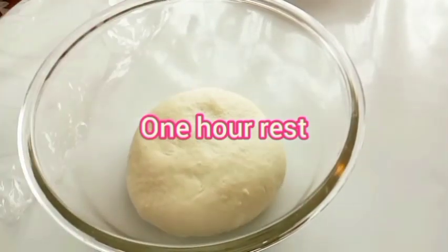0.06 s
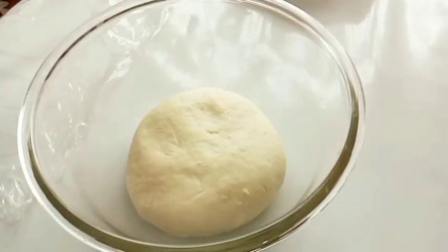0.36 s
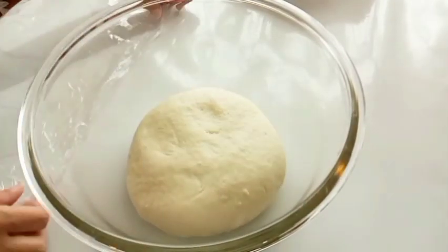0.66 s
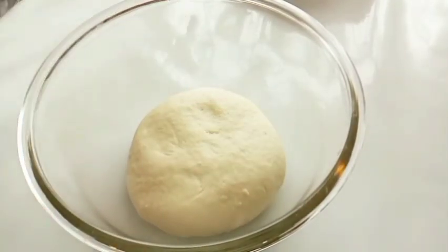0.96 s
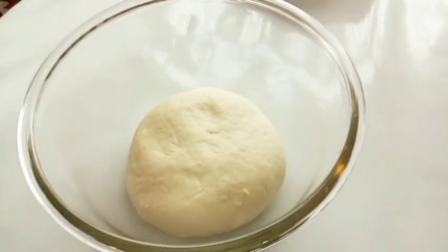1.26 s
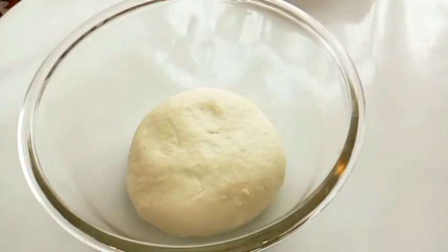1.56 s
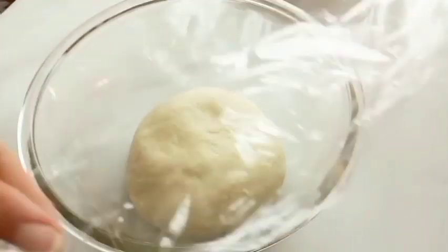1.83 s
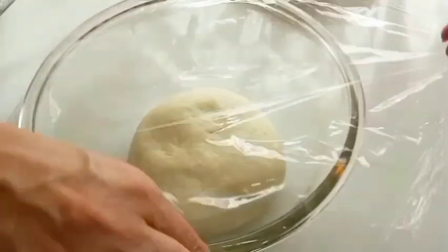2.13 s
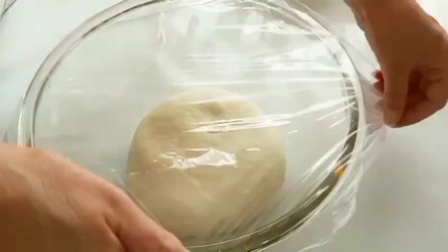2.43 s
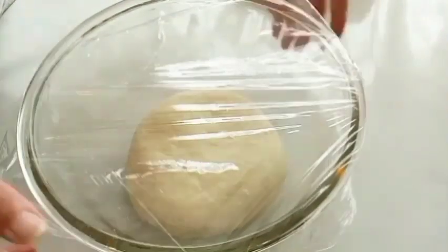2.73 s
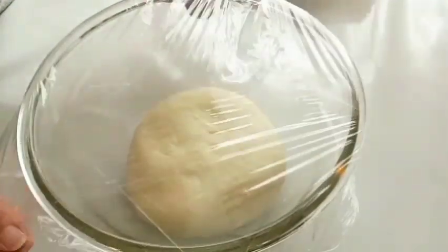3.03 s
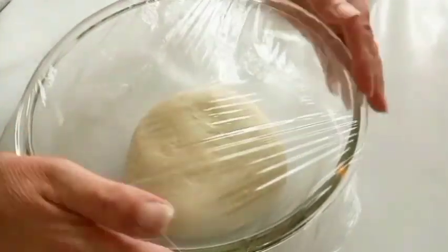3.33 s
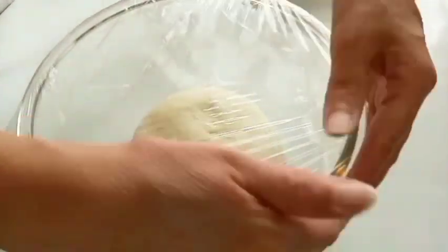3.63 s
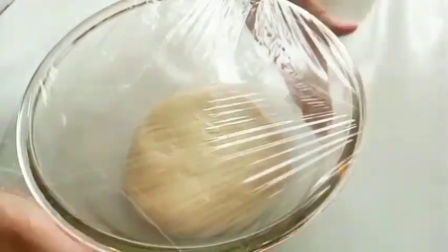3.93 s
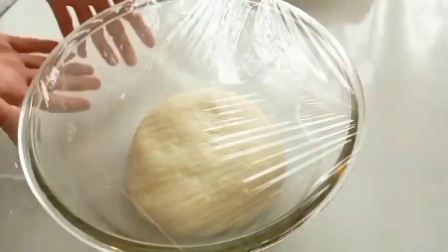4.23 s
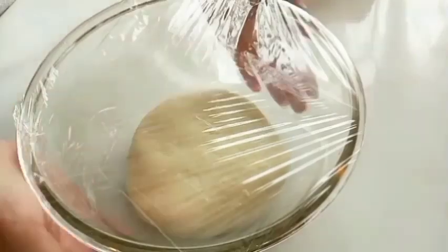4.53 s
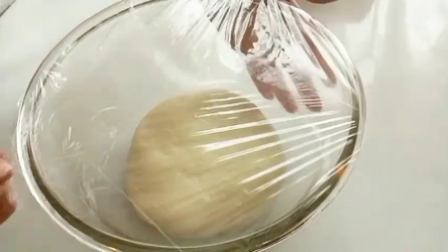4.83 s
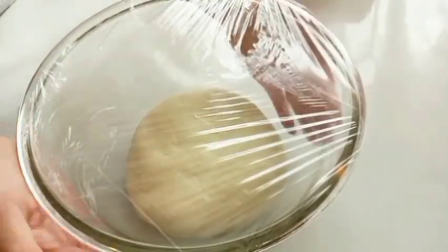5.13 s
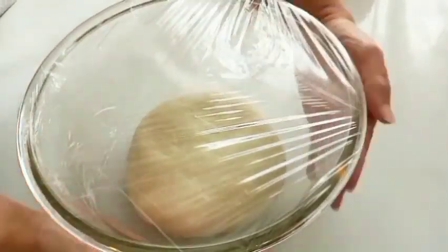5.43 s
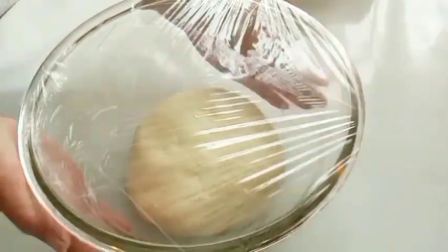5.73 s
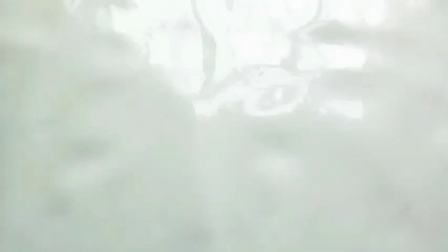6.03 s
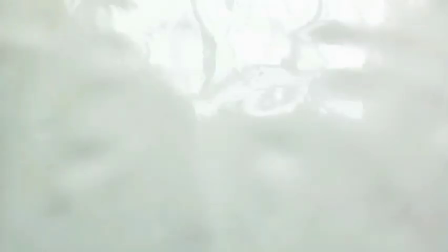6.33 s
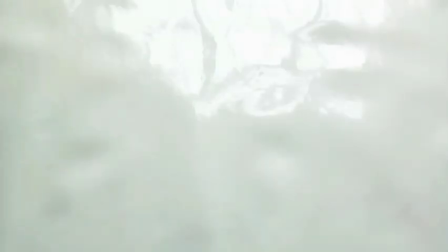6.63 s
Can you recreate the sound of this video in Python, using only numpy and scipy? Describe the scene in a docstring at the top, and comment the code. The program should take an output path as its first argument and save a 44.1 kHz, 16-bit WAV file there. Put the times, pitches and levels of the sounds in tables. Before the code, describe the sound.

Plastic cling film rustles and crackles close by as hands stretch it over a glass bowl, with soft bumps in a quiet kitchen.

```python
"""Cling film is picked up, stretched over a glass bowl and smoothed down round the rim, close to two
microphones. It rustles in dense tiny stick-slips; creases snap through, rubbed taut patches ring, and soft low
bumps sound over a quiet kitchen's rumble. At 5.8 s all falls silent for about 0.4 s; then only calmer room air
is heard."""
import sys
import numpy as np
from scipy import signal
from scipy.fft import rfft, irfft, next_fast_len
from scipy.io import wavfile
from scipy.ndimage import uniform_filter1d

SR = 44100
rng = np.random.default_rng(int(sys.argv[2]) if len(sys.argv) > 2 else 0)


def master_out(mix):
    """Clip the mix to full scale and print it as 16-bit PCM to the path in sys.argv[1]."""
    frames = np.transpose(np.atleast_2d(mix))
    ceiling = np.clip(frames, -1, 1)
    pcm = np.round(ceiling * 32767).astype(np.int16)
    wavfile.write(sys.argv[1], SR, pcm)


N = 294973
TIME = np.arange(N) / SR


def rustle(hands, per_s=7500, spread_db=2.0, clump_db=1, trim_db=4.5, spots=20):
    """Many spots of film stick and slip, in clumps of a few milliseconds."""
    level_db, bright_db, flap_db, side_db = hands
    clumps = evened(uniform_filter1d(rng.standard_normal(N), size=220))
    train = slips(N, per_s, spread_db) * gain_of(clump_db * clumps)
    spot = rng.integers(0, spots, N)
    x = sum(signal.oaconvolve((train * (spot == k))[None], crease(), axes=1)[:, :N]
            for k in range(spots))
    x = folding(x)
    x /= np.sqrt(uniform_filter1d(x ** 2, size=900, axis=1) + 1e-9)  # the pull alone sets the power
    return film(x, bright_db, flap_db, side_db) * gain_of(level_db + trim_db)


def snaps(hands, per_s=9000, spread_db=2.5, tick=4.5, trim_db=4.0, lead_ms=0.7, size=2048):
    """A crease gives way: one tick in a short avalanche of slips; the sheet flaps if slack."""
    # t/s, length/ms, level/dB before trim, brightness/(dB/octave), left-right/dB
    large_snaps = [(0.3228, 0.66, -44, 20, 18), (0.8678, 0.94, -39, 12, -2), (1.544, 1.2, -42.5, 7, 16),
                   (1.6044, 3.2, -51, 3, 3), (2.0907, 1.3, -40, 15, -10), (2.3609, 1.4, -39, 7.5, -2),
                   (2.4392, 1.3, -38.5, 2.5, 1), (2.7845, 6, -33.5, 4, 7), (2.7944, 4.7, -37.5, 3, 2.5),
                   (2.8338, 2.4, -27.5, -3, 6), (2.8582, 0.49, -20, -3, -0.5), (2.8612, 5.7, -27.5, -1, 1),
                   (2.9402, 1.1, -27, -2, 8), (2.9441, 2, -32.5, 3, 5), (3.0376, 3.6, -38.5, 0, 13),
                   (4.1785, 3.4, -43.5, 6, 11), (4.4833, 4.6, -47.5, 9.5, 0.5),
                   (4.6113, 1.55, -32, 2.5, 9.5), (4.6345, 2.4, -37, 5.5, -4), (4.6556, 5, -36, 1.5, -1),
                   (4.6663, 6.5, -33, 2.8, 2.5), (4.7145, 3.1, -24.5, 4, 14), (4.7392, 2, -20.5, 3, 8),
                   (4.7432, 6, -22, 2.5, -2), (4.7632, 3.6, -36.5, -1.4, -3), (4.9904, 2.8, -31, -0.5, 0),
                   (5.1004, 2.7, -28, 0.8, 2), (5.152, 1.04, -26.5, 2, 5), (5.2493, 1.2, -51, 12, 3),
                   (5.3399, 6.2, -40.5, -0.8, 5), (5.382, 0.87, -34.5, -1, 5), (5.3932, 1.1, -37, 4, 3),
                   (5.5866, 3.5, -35, 6, 9)]
    out = np.zeros((2, N))
    ms = (np.arange(size) - size // 4) * 1000 / SR
    for s, length_ms, level_db, bright_db, side_db in large_snaps + crinkles(hands):
        flap_db = min(hands[2, int(s * SR)] - 3, -9)  # less flap than the stroke
        avalanche = np.exp(-(2 * ms / length_ms) ** 2) + 0.076 * np.exp(-abs(ms / length_ms))
        train = slips(size, per_s, spread_db) * avalanche
        train[size // 4] += tick
        x = signal.fftconvolve(train[None], crease(), axes=1)[:, :size]
        packed = np.sqrt(length_ms / np.ptp(ms))  # energy lies within the snap's length
        snap = gain_of(level_db + trim_db) * packed * film(x, bright_db, flap_db, side_db)
        add(out, s + (ms[0] - lead_ms) / 1000, snap)
    return out


def crinkles(hands, per_s=18, length_ms=1.2, threshold_db=-62.5, count=200):
    """Rows of small random snaps, a little louder and brighter than the stroke that frees them."""
    rows = []
    for when, chance, strength, across in rng.random((count, 4)):
        level_db, bright_db, _, side_db = hands[:, int(when * N)]
        if level_db > threshold_db and chance < per_s * TIME[-1] / count:
            snap_db = level_db + 1 + 5 * strength
            rows.append((when * TIME[-1], length_ms, snap_db, bright_db + 4.5, side_db + 15 * across))
    return rows


def swishes(width_share=0.24, side_db=5, per_s=2500, spread_db=3, size=8192):
    """Slips on a taut patch drive one broad resonance that glides with the film's tension."""
    # middle t/s, length/s, level/dB, start f/Hz, end f/Hz
    rubs = [(0.48, 0.06, -51, 3030, 2300), (0.891, 0.1, -52, 1100, 600), (1.33, 0.13, -56, 8200, 8500),
            (1.819, 0.034, -57.5, 1190, 690), (2.861, 0.011, -35, 600, 520), (2.9, 0.12, -48.5, 640, 700),
            (3.256, 0.19, -57, 2190, 2500), (3.744, 0.098, -54.5, 1780, 1780),
            (4.34, 0.077, -43, 2993, 1985), (4.388, .11, -53.5, 1947, 1750),
            (4.666, 0.037, -40.5, 1150, 845), (4.913, 0.048, -53, 2300, 2000),
            (5.105, 0.11, -48, 1464, 1700), (5.3, 0.043, -48.5, 1900, 1550),
            (5.589, 0.023, -48.5, 1676, 1650)]
    out = np.zeros((2, N))
    t = (np.arange(size) - size // 2) / SR
    for s, length_s, level_db, start_hz, end_hz in rubs:
        along = np.clip(t / length_s + 0.5, 0, 1)
        glide_hz = start_hz * (end_hz / start_hz) ** along
        carrier = np.exp(2j * np.pi * np.cumsum(glide_hz) / SR)
        pole = np.exp(-np.pi * width_share * start_hz / SR)
        drive = signal.fftconvolve(slips(size, per_s, spread_db)[None], crease(), axes=1)[:, :size]
        ring = (carrier * signal.lfilter([1], np.poly([pole, pole]), drive / carrier)).real
        ring /= ring.std(axis=1, keepdims=True)
        add(out, s + t[0], gain_of(level_db) * ring * np.sin(np.pi * along) ** 2 * panned(side_db))
    return out


def handling(held_s=(0.36, 5.82), stir_db=-80, edge_db=13.5, roundness=1.94):
    """Level, brightness, flap and side over time: strokes swell and fade; the strongest sets the colour."""
    # peak t/s, swell/s, fade/s, level/dB, brightness/(dB/octave), flap/dB, left-right/dB
    strokes = [ (.64, 0.05, 0.026, -61, -3.5, -2, 4), (.735, 0.094, 0.11, -53.5, 0, -16, 5),
               (0.883, .04, .048, -46.5, -2, -10.5, 3.5), (1.305, 0.054, 0.048, -59.5, -0.5, -13, 7),
               (1.368, 0.012, 0.015, -53.5, 3.5, -21, 18), (1.48, 0.097, 0.15, -61.5, 1.5, -11, 11),
               (1.513, .022, 0.03, -43, -1.5, -18.5, 24), (1.788, 0.024, 0.012, -61.5, -18, 3.5, 4),
               (1.813, 0.014, 0.041, -56, -0.5, -4.5, -2), (2.02, 0.075, 0.28, -61.5, 3, -13, -2),
               (2.23, 0.12, 0.13, -45, 2, -15, -3), (2.4, 0.032, 0.059, -52, 5, -16.5, -1),
               (2.51, 0.054, .03, -57, 3, -18, -0.5), (2.601, 0.023, 0.0252, -57, 4.5, -15.5, -4.5),
               (2.787, 0.013, 0.019, -39.5, -1.5, -10, 3.5), (2.852, 0.07, 0.043, -44, 3, -8, 4.5),
               (2.934, 0.092, 0.081, -48.5, 0, -10, 1.5), (3.04, 0.0084, 0.02, -49.5, -2, -10.5, -1),
               (3.324, 0.12, 0.039, -51, 0.5, -17.5, -3.5), (3.366, 0.031, 0.028, -47, 0, -20, -2.5),
               (3.533, 0.037, 0.054, -51, 1.5, -13, -4), (3.715, .09, 0.14, -52, -1, -20, -2.5),
               (3.84, 0.11, 0.028, -51.5, 2.5, -28, 1), (4.21, 0.095, 0.16, -52.5, 2.5, -13.5, 3),
               (4.337, .13, 0.096, -42.5, 1, -28, 1.5), (4.64, 0.032, 0.078, -38, 2.5, -21.5, -1),
               (4.728, 0.081, .042, -31.5, 1.5, -15, 1), (4.84, .1, 0.092, -46, 3.5, -30.5, 5),
               (5, 0.068, 0.095, -45.5, -0.5, -30, 0.5), (5.125, 0.075, 0.07, -41, 1.5, -32, 0),
               (5.298, 0.019, 0.04, -44.5, 1, -38, -2), (5.38, 0.073, 0.071, -46.5, 1.5, -25, 0.5),
               (5.485, 0.055, 0.031, -51.5, 2.5, -25, -1), (5.594, 0.013, 0.024, -48, 1.5, -35, -3),
               (5.67, 0.044, 0.1, -51.5, 0, -33, 5)]
    t = TIME[::32]
    held = (t > held_s[0]) & (t < held_s[1])
    powers = [gain_of(stir_db) ** 2 * held + 1e-14]  # held film stirs between strokes
    colours = [(-0.5, 1.5, 3.5)]  # the stir's brightness, flap, side
    for peak_s, swell_s, fade_s, level_db, *colour in strokes:
        away = abs((t - peak_s) / np.where(t < peak_s, swell_s, fade_s))
        powers.append(gain_of(level_db - edge_db * away ** roundness) ** 2)
        colours.append(colour)
    total = np.sum(powers, axis=0)
    blend = np.transpose(colours) @ powers / total
    return np.array([np.interp(TIME, t, curve) for curve in (10 * np.log10(total), *blend)])


def slips(size, per_s, spread_db):
    """A random train of tiny slips, mostly small, a few large."""
    strength = gain_of(spread_db * np.minimum(rng.exponential(1, size), 5.5))
    return strength * rng.choice([-1, 1], size) * (rng.random(size) < per_s / SR)


def crease(flutter_ms=0.52, bowl_ms=3.8, lag_ms=0.85, scatter_hz=1500, size=900):
    """Response of one spot of film: a tick, a brief flutter, then scatter from bowl and counter."""
    ms = np.arange(size) * 1000 / SR
    own, shared = rng.standard_normal((2, size)), rng.standard_normal(size)
    flutter = 0.27 * (own + shared) / np.sqrt(2) * np.exp(-ms / flutter_ms)
    scatter = 0.12 * own * np.exp(-ms / bowl_ms)
    highpass = signal.butter(1, scatter_hz, "high", fs=SR)  # long waves hardly scatter
    response = signal.lfilter(*highpass, flutter + scatter)
    response[:, 0] += 1
    lag = int(lag_ms * rng.uniform(0.7, 1.3) * SR / 1000)  # left microphone is further away
    response[0] = np.pad(response[0], (lag, 0))[:size]
    return response / np.linalg.norm(response, axis=1, keepdims=True)


def film(x, bright_db, flap_db, side_db, lean_db=-3.5):
    """Tight film sounds bright, its top octaves leaning right; slack film adds a lower papery flap."""
    # radiated spectra: f/Hz, level/dB
    crease_spectrum = [(1150, -27.5), (1450, -7), (1700, -5), (2100, -2.5), (2800, 0.5), (4600, 0),
                       (6500, 1), (8000, 0.5), (9500, -5.5), (11000, -3), (13200, -10.5), (15000, -3.5),
                       (16000, -17.5)]
    sheet_spectrum = [(280, -33.5), (420, -12.5), (560, -1), (720, -2.5), (900, -3), (1150, -2.5),
                      (1400, -13.5), (1800, -15)]
    crackle = evened(shaped(x, crease_spectrum))
    bands = [(octave, gain_of(bright_db * octave), band) for octave, band in octaves(crackle)]
    power = sum(gain ** 2 * np.mean(band * crackle) for _, gain, band in bands)
    tilted = sum(gain * band * panned(side_db + lean_db * octave) for octave, gain, band in bands)
    flap = gain_of(flap_db) * evened(shaped(x, sheet_spectrum)) * panned(side_db)
    return tilted / np.sqrt(power) + flap


def folding(x, shared_db=3.0, own_db=2):
    """As the folds change shape, the film's resonances come and go."""
    z = signal.stft(x, nperseg=512)[2]
    shared, own = patches(z.shape[1:], 9, 6), patches(z.shape, 12, 3)
    return signal.istft(z * gain_of(shared_db * shared + own_db * own), nperseg=512)[1][:, :N]


def ears(x):
    """The right microphone is dull around 8 kHz, the left one around 12 kHz."""
    # f/Hz, left-right/dB
    balance = [(400, 4.5), (1000, 1), (2200, 1), (4200, -1), (6000, 1), (8000, 11), (10000, -0.5),
               (12000, -5), (15500, 3)]
    size = next_fast_len(N)
    side_db = read(balance, np.fft.rfftfreq(size, 1 / SR))
    return irfft(rfft(x, size) * panned(side_db), size)[:, :N]


def bumps(rise_s=0.0089, trim_db=3, side_db=4, lag_hz_per_rad=170):
    """Soft low bumps: damped low thuds that swell and die within a few cycles."""
    # t/s, level/dB before trim, f/Hz
    thuds = [(0.371, -45.5, 240), (0.747, -46.5, 249), (0.907, -44, 145), (1.21, -53, 140),
             (1.459, -50.5, 148), (1.603, -49, 136), (2.261, -49, 129), (2.415, -47.5, 133),
             (2.788, -42.5, 242.5), (3.112, -50, 129), (3.212, -51, 75), (3.809, -47, 238),
             (3.876, -51.5, 116), (4.596, -48.5, 262), (4.67, -52, 298), (4.831, -49.5, 273),
             (5.019, -54.5, 86), (5.321, -51, 71), (5.614, -48.5, 89.1)]
    out = np.zeros((2, N))
    t = np.arange(SR // 6) / SR
    swell = (t / rise_s / 2) ** 2 * np.exp(2 - t / rise_s)
    for s, level_db, hz in thuds:
        phase = 2 * np.pi * (hz * t + rng.random()) - np.array([[hz / lag_hz_per_rad], [0]])
        add(out, s - 2 * rise_s, gain_of(level_db + trim_db) * swell * np.sin(phase) * panned(side_db))
    return out


def kitchen(x, gap_s=0.00057):
    """A short diffuse reverberation whose treble dies first."""
    # f/Hz, t60/s
    decay = [(300, .3), (2000, 0.32), (7000, 0.13), (15000, 0.13)]
    hz, t, z = signal.stft(rng.standard_normal((2, SR // 2)), SR, nperseg=256)
    tail = signal.istft(z * gain_of(-60 * t / read(decay, hz)[:, None]), SR, nperseg=256)[1]
    tail *= np.arange(tail.shape[1]) / SR > gap_s
    return signal.fftconvolve(x, tail / np.linalg.norm(tail[0]), axes=1)[:, :N]


def air(spectrum, level_db, patchy_db, bass_patchy_db, side_db=3, bass_hz=350, left_lag_ms=0.96):
    """Room noise with a lumpy rumble, alike in both microphones only in the bass."""
    # f/Hz, left-right coherence
    coherence = [(40, .55), (130, .9), (290, .85), (640, .6), (1400, .25), (15000, .05)]
    hz = np.fft.rfftfreq(1024, 1 / SR)
    shape = (len(hz), N // 256 + 5)
    noise = rng.standard_normal((4, *shape))
    left, own = noise[::2] + 1j * noise[1::2]
    bass_db = bass_patchy_db * patches(shape, 7, 2)
    lumps_db = np.where(hz[:, None] < bass_hz, bass_db, patchy_db * patches(shape, 8, 5))
    same = (read(coherence, hz) * np.exp(2j * np.pi * hz * left_lag_ms / 1000))[:, None]
    z = np.array([left, same * left + np.sqrt(1 - abs(same) ** 2) * own])
    z *= gain_of(read(spectrum, hz)[:, None] + lumps_db) / np.sqrt(1 + same.real)
    x = signal.istft(z, nperseg=1024, noverlap=768)[1][:, :N] * panned(side_db)
    return gain_of(level_db) * x / x.mean(0).std()


def whine(hz=885, width_hz=45, level_db=-82):
    """A faint fuzzy tone in the room, perhaps a fan."""
    resonance = signal.iirpeak(hz, hz / width_hz, SR)
    return gain_of(level_db) * evened(signal.lfilter(*resonance, rng.standard_normal((2, N))))


def gain_of(db):
    """Decibels to amplitude."""
    return 10 ** (np.asarray(db) / 20)


def evened(x):
    """Scales to unit rms."""
    return x / np.sqrt(np.mean(x ** 2) + 1e-20)


def read(points, hz):
    """Interpolates on a log-frequency axis."""
    f, value = np.transpose(points)
    return np.interp(np.log(hz + 1), np.log(f + 1), value)


def add(mix, s, sound):
    """Mixes a stereo sound in at time s."""
    part = mix[:, max(round(s * SR), 0):][:, :sound.shape[1]]
    part += sound[:, :part.shape[1]]


def panned(side_db):
    """Two gains of constant total power."""
    pair = gain_of(np.array([[0.5], [-0.5]]) * side_db)
    return pair / np.sqrt((pair ** 2).mean(0))


def shaped(x, points):
    """Filters by a spectrum with 12 dB/octave skirts."""
    size = next_fast_len(x.shape[1])
    hz = np.fft.rfftfreq(size, 1 / SR)
    skirts = np.minimum(hz / points[0][0], 1) * np.minimum(points[-1][0] / (hz + 1), 1)
    return irfft(rfft(x, size) * gain_of(read(points, hz)) * skirts ** 2, size)[:, :x.shape[1]]


def octaves(x, middle_hz=5600):
    """Four overlapping bands: (octaves above the middle, band)."""
    size = next_fast_len(x.shape[1])
    place = np.log2((np.fft.rfftfreq(size, 1 / SR) + 1) / middle_hz)
    centres = np.arange(4) - 1.5
    z = rfft(x, size)
    return [(c, irfft(z * np.interp(place, centres, centres == c), size)[:, :x.shape[1]])
            for c in centres]


def patches(shape, frames, bins):
    """A smooth random field over time and frequency, unit rms."""
    slow = uniform_filter1d(rng.standard_normal(shape), frames, axis=-1)
    return evened(uniform_filter1d(slow, bins, axis=-2))


def scene(rustle_room_db=-15, snap_room_db=-14, calm_from_s=6):
    """Film and hands in the kitchen; the air is calmer after the silence."""
    # room air spectra: f/Hz, relative level/dB
    busy_spectrum = [(15, -52), (25, -22), (27, -44.5), (53, -35), (68, -20), (141, 0), (242, -6),
                     (641, -25.5), (887, -20.5), (1260, -27.5), (1520, -22.5), (6050, -28.5), (13600, -38),
                     (14800, -33), (16000, -40.5)]
    calm_spectrum = [(15, -71), (25, -44.5), (92, -25), (108, -9), (134, -4), (175, -12), (256, -9),
                     (373, -27), (988, -28.5), (1440, -24), (1740, -24), (2410, -24.5), (3920, -34),
                     (16000, -46.5)]
    hands = handling()
    busy = air(busy_spectrum, level_db=-57.5, patchy_db=3.0, bass_patchy_db=3.0) + whine()
    calm = air(calm_spectrum, level_db=-68, patchy_db=3.5, bass_patchy_db=1.0)
    low = bumps() + np.where(TIME > calm_from_s, calm, busy)
    sliding = rustle(hands) + swishes()
    snapping = snaps(hands)
    room = kitchen(gain_of(rustle_room_db) * sliding + gain_of(snap_room_db) * snapping)
    return ears(sliding + snapping + room) + low


def record(dry, edge_hz=15900):
    """Overall gain with a brief silence, then the band limit."""
    # t/s, gain
    gain_curve = [(5.812, 0.48), (5.824, 0.0034), (6.158, 0.0021), (6.22, 0.29), (6.3, 0.74)]
    gain = np.interp(TIME, *np.transpose(gain_curve))
    lowpass = signal.firwin(255, edge_hz, window=("kaiser", 9), fs=SR)
    return signal.oaconvolve(dry * gain, lowpass[None], "same")


dry = scene()
out = record(dry)
master_out(out)
```